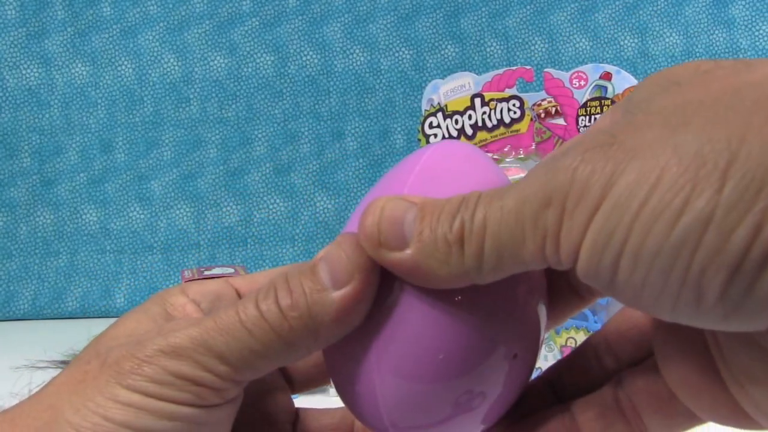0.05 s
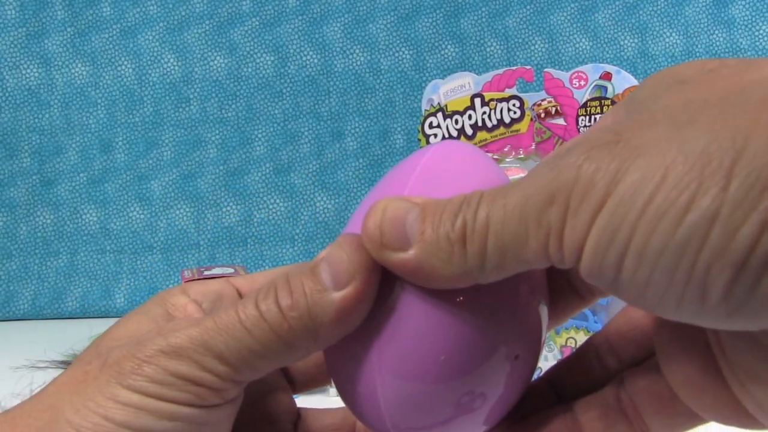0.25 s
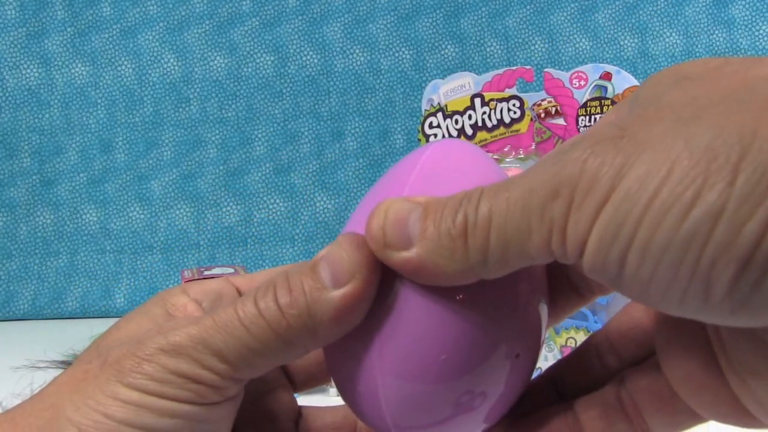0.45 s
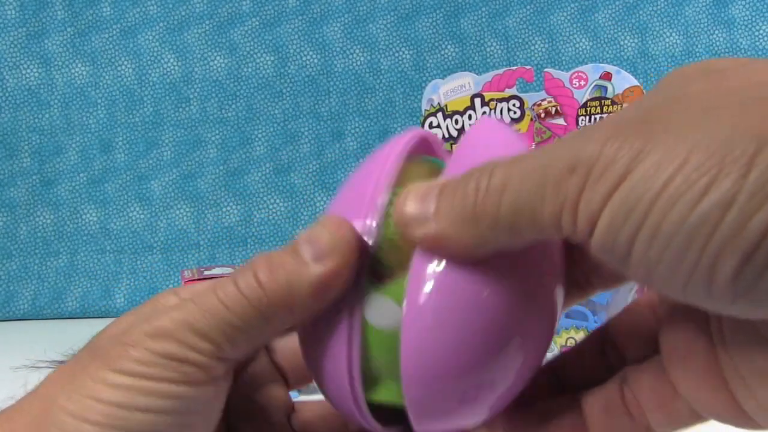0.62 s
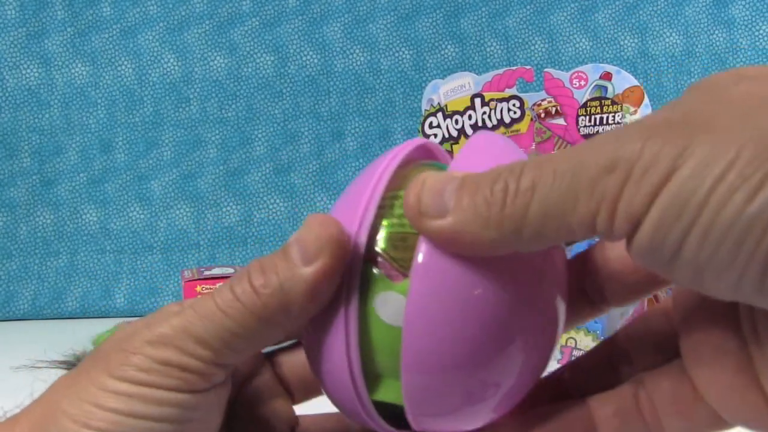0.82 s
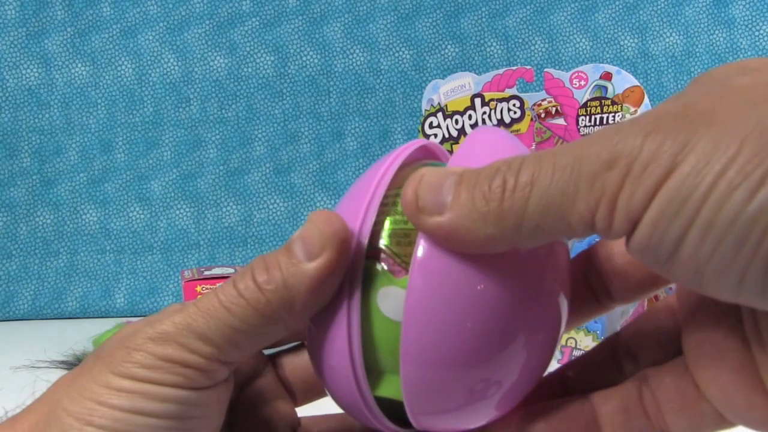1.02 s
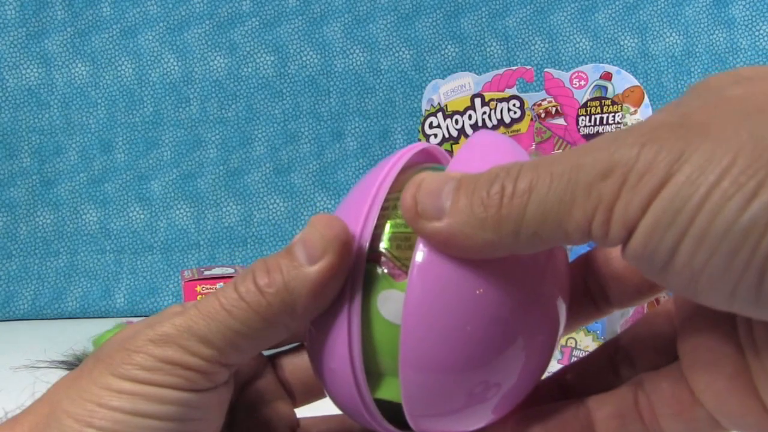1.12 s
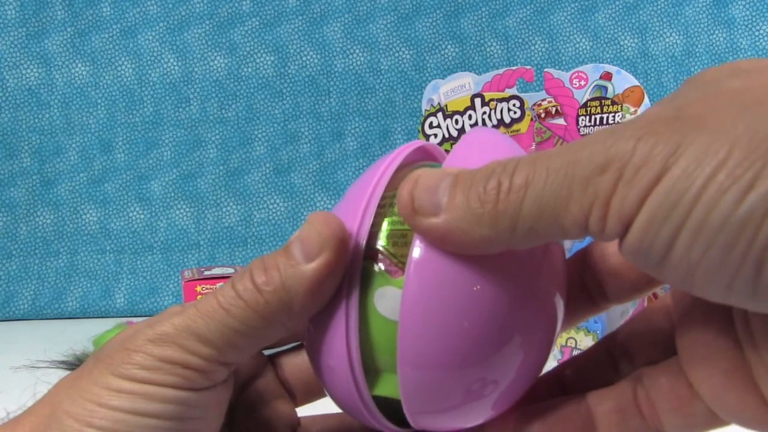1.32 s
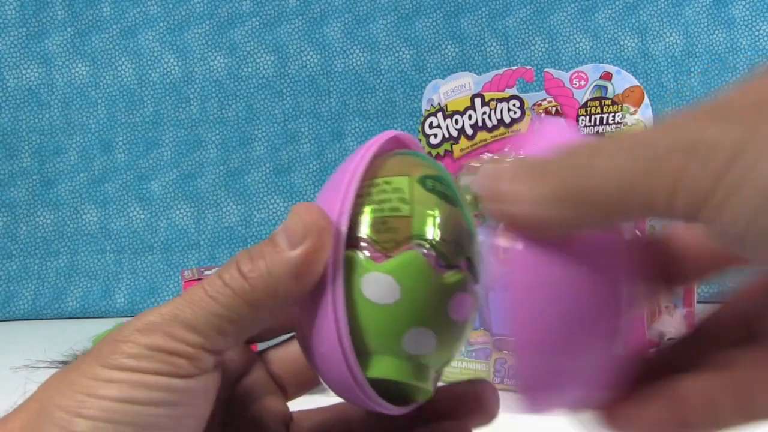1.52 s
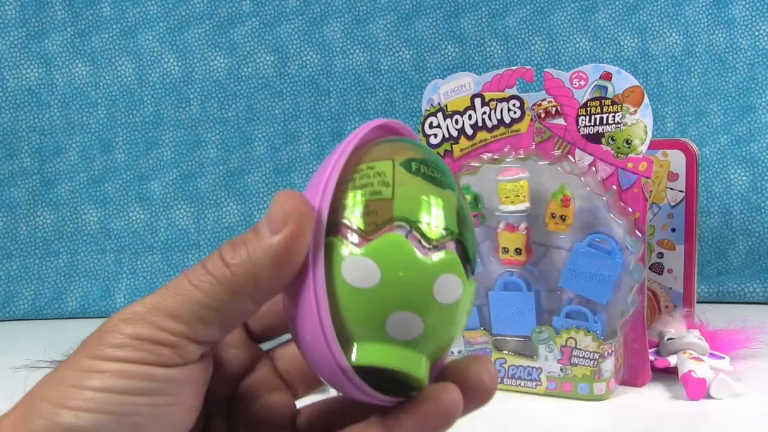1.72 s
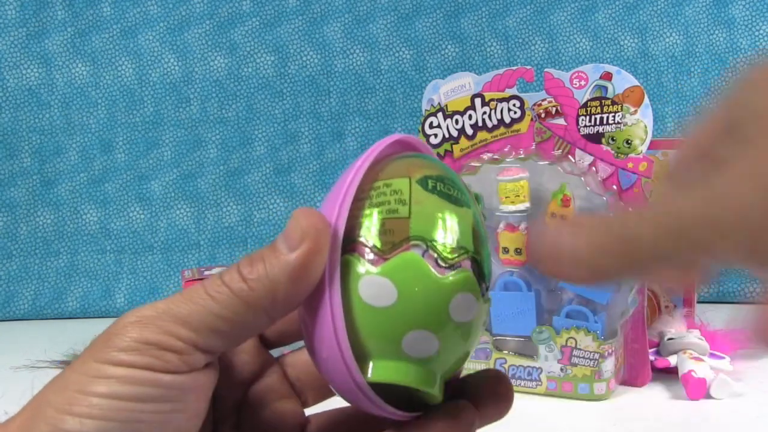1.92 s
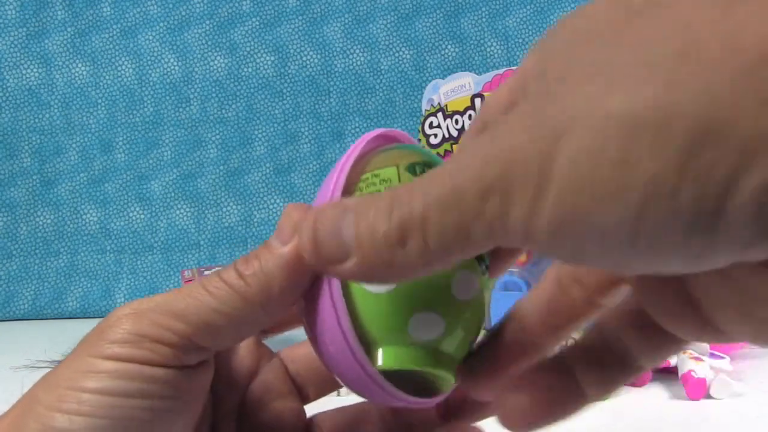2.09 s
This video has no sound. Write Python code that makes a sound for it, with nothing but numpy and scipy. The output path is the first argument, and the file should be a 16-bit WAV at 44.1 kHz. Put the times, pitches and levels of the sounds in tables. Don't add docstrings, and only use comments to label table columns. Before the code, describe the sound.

Plastic egg seam creaking, a loud snapping pop with quick clicks, later a shell half dropped and rocking

```python
import sys
import numpy as np
from scipy import signal
from scipy.fft import rfft, irfft, next_fast_len
from scipy.io import wavfile
from scipy.ndimage import uniform_filter1d

SR = 44100
rng = np.random.default_rng(int(sys.argv[2]) if len(sys.argv) > 2 else 0)


def voltage_ratio(decibels):
    exponent = np.asarray(decibels, float) / 20
    return 10 ** exponent


def file_out(sig):
    cols = np.atleast_2d(sig).T
    lim = np.clip(cols, -1, 1)
    pcm = np.round(lim * 32767).astype(np.int16)
    wavfile.write(sys.argv[1], SR, pcm)


N = 94903

# centre in Hz, width in Hz, level in dB.
OPEN_SHELL = [(210, 19, -5), (437, 160, -20), (650, 140, -3.5), (906, 160, -2), (1500, 110, -2.5),
              (2250, 290, -7.5), (3930, 910, -24.5), (6400, 4500, -28)]
# (centre in Hz, width in Hz, level in dB).
RATTLES = [
    (0.661, -28.5, 0.59, [(210, 130, 5.5), (415, 130, -2.5), (759, 720, -1.5), (1500, 930, 2), (4040, 2800, -4.5), (10870, 5500, -28)]),
    (1.78, -20.5, 0.3, [(210, 180, -4), (342, 130, 3), (570, 200, 1), (1150, 850, -7), (2100, 580, -7.5), (4200, 1500, -21.5)]),
    (1.866, -24, 0.45, [(125.6, 25, -2), (418, 90, -1), (944, 140, 4.5), (1620, 690, -5), (2670, 400, -3.5), (4000, 1070, -15.5), (6660, 3500, -24.5)]),
]
CLICK_TOUCH_S, TABLE_TOUCH_S = .00007, .0003


def unit(x):
    return x / np.sqrt(np.mean(x ** 2) + 1e-20)


def along(points, hz):
    f, v = np.transpose(points)
    return np.interp(np.log(hz + 1), np.log(f + 1), v)


def filtered(x, response):
    m = next_fast_len(N + SR // 2)
    return irfft(rfft(x, m) * response(np.fft.rfftfreq(m, 1 / SR)), m)[..., :N]


def body(x, peaks, sign=-1):
    def response(f):
        total = 0
        for k, (centre, width, db) in enumerate(peaks):
            damping = 1j * f * width
            total = total + sign ** k * voltage_ratio(db) * damping / (centre * centre - f * f + damping)
        return total
    return filtered(x, response)


def coloured(spectrum):
    return unit(filtered(rng.standard_normal(N), lambda hz: voltage_ratio(along(spectrum, hz))))


def spread(pair, alike, spectrum=((100, 0),)):
    def response(hz):
        turn = np.arccos(np.clip(along(alike, hz), -1, 1)) / 2
        return voltage_ratio(along(spectrum, hz)) * [np.cos(turn), np.sin(turn)]
    mid, side = filtered(pair, response)
    return np.array([mid + side, mid - side])


def stereo(spectrum):
    # frequency in Hz, left-right likeness from -1 to 1.
    alike = [(60, 0.084), (240, 0.18), (950, -0.26), (3770, 0.68), (15000, 0.82)]
    return unit(spread(rng.standard_normal((2, N)), alike, spectrum))


def fading(start_s, t60, rise_s=.0002):
    t = np.maximum(np.arange(N) / SR - start_s, 0)
    return voltage_ratio(-60 * t / t60) * (1 - np.exp(-t / rise_s))


def pulses(rows, touch_s):
    s, db = np.transpose(rows)[:2]
    push = np.hanning(round(touch_s * SR) + 2)
    impulses = np.bincount(np.round(s * SR).astype(int), voltage_ratio(db), N)
    return np.convolve(impulses, push / push.sum())[:N]


def hits(rows, peaks, body_db, touch_s):
    # frequency in Hz, density in dB per Hz.
    crack_colour = [(1200, 0.5), (2500, -5), (4000, 3), (6000, 0.5), (8000, -1.5), (11000, -8.5),
                    (14000, -15.5), (16000, -23)]
    crack_t60_s, crack_rise_s = .0075, .0003
    own, size = np.zeros(N + SR), SR // 4
    t = np.arange(size) / SR
    noise = np.pad(coloured(crack_colour), (0, SR))
    crack_shape = voltage_ratio(-60 * t / crack_t60_s) * (1 - np.exp(-t / crack_rise_s))
    for s, db, hz, t60, crack_db in rows:
        at = slice(round(s * SR), round(s * SR) + size)
        note = voltage_ratio(-60 * t / t60) * (1 - np.exp(-t / .0002)) * np.sin(2 * np.pi * hz * t)
        own[at] += voltage_ratio(db) * (note + voltage_ratio(crack_db) * crack_shape * noise[at])
    return own[:N] + voltage_ratio(body_db) * body(pulses(rows, touch_s), peaks)


def rattle(s, db, t60, peaks):
    lump_s, lumps_db = .002, 2

    def smooth(v):
        return uniform_filter1d(v, size=int(lump_s * SR))

    lumps = unit(smooth(smooth(rng.standard_normal(N))))
    contacts = unit(voltage_ratio(lumps_db * lumps) * rng.standard_normal(N))
    return voltage_ratio(db) * body(contacts * fading(s, t60, 0.001), peaks) / np.std(body(contacts, peaks))


def creak():
    # time in seconds, peak in dB.
    slip_rows = [(0.01, -33), (0.03, -35), (0.062, -39), (0.152, -32), (0.218, -32), (0.256, -34),
                 (0.29, -35), (0.334, -35), (0.382, -29), (0.399, -35), (0.447, -35), (0.462, -34),
                 (0.477, -32), (0.487, -32), (0.498, -39), (0.506, -36), (0.513, -36), (0.52, -39),
                 (0.527, -39), (0.533, -39), (0.54, -43), (0.548, -43), (0.556, -40), (0.563, -40),
                 (0.569, -42), (0.584, -45), (0.599, -40), (0.611, -40), (0.622, -39)]
    # time in seconds, peak in dB.
    last_rows = [
        (.636, -39),
        (.650, -40),
    ]
    # centre in Hz, width in Hz, level in dB.
    seam_modes = [(500, 85, 8), (684, 152, 6.5), (1135, 66, 3.5), (1700, 160, -1), (2450, 310, -26)]
    # centre in Hz, width in Hz, level in dB.
    squeezed_modes = [(500, 100, -3.5), (750, 210, 6.5), (1135, 39, 5), (1800, 270, 4), (3300, 910, -3)]
    lag_s, touch_s, squeeze_s, seam_db = .0013, .00038, .37, 25.5
    slips = pulses([(s + lag_s, db) for s, db in slip_rows + last_rows], touch_s)
    late = np.arange(N) / SR > squeeze_s
    loose = body(slips * ~late, seam_modes, sign=0.98)
    return voltage_ratio(seam_db) * (loose + body(slips * late, squeezed_modes, sign=0.92))


def skin_rub():
    # frequency in Hz, density in dB per Hz.
    rub_colour = [(150, -8.5), (400, -7), (1200, -13), (3000, -18.5), (7000, -23), (13000, -38)]
    rub_db, ends_s = -57, 0.6
    return voltage_ratio(rub_db) * stereo(rub_colour) * (np.arange(N) / SR < ends_s)


def hiss():
    # frequency in Hz, density in dB per Hz.
    hiss_colour = [(15, -66), (25, -41.5), (82, -5), (120, -9), (180, -3), (384, -7.5), (641, -9),
                   (3250, -19.5), (16000, -30.5)]
    hiss_db = -55
    return voltage_ratio(hiss_db) * stereo(hiss_colour)


def room(x):
    # frequency in Hz, t60 in seconds.
    tail_t60 = [(150, 0.31), (600, 0.56), (2000, 0.31), (6000, 0.32), (14000, 0.27)]
    # frequency in Hz, left-right likeness from -1 to 1.
    room_alike = [(150, 0.82), (500, .8), (1200, 0.63), (2500, -0.25), (6000, -0.065), (14000, 0.98)]
    tail_db, wall_db, wall_s, wall_t60_s = -12, -15, 0.00928, 0.0067
    turn_s = .04
    out, step, size = np.zeros((2, N + SR)), round(turn_s * SR), SR // 3
    for k in range(0, N, step):
        hz, t, z = signal.stft(rng.standard_normal((2, size)), SR, nperseg=256)
        decay = voltage_ratio(-60 * t / along(tail_t60, hz)[:, None])
        tail = signal.istft(z * decay, SR, nperseg=256)[1][:, :size]
        wall = rng.standard_normal((2, size)) * fading(wall_s, wall_t60_s)[:size]
        answer = voltage_ratio(tail_db) * tail / np.linalg.norm(tail[0])
        answer = answer + voltage_ratio(wall_db) * wall / np.linalg.norm(wall[0])
        wet = signal.fftconvolve(x[None, k:k + step], answer, axes=1)
        out[:, k:k + wet.shape[1]] += wet
    return spread(out[:, :N], room_alike)


def placed(x, pan, lead):
    # frequency in Hz, level in dB.
    scatter_colour = [(300, -27.5), (1000, -14), (2500, -10), (6000, -10.5), (14000, -13.5)]
    scatter_t60_s = .006
    side = np.array([[.5], [-.5]])
    burst = (rng.standard_normal(N) * fading(0, scatter_t60_s))[:512]
    scatter = signal.fftconvolve(x, burst / np.linalg.norm(burst))[:N]
    scatter = filtered(scatter, lambda hz: voltage_ratio(along(scatter_colour, hz)))
    direct = filtered(x, lambda hz: voltage_ratio(side * along(pan, hz)) * np.exp(1j * side * along(lead, hz)))
    return direct + 2 * side * scatter


def pop():
    pop_s, pop_db, swell_s, t60_s = .6680, -2.5, .0032, 0.014
    pop_hz, rise_hz_per_s = 470, 48400
    t = np.arange(N) / SR - pop_s
    shape = np.where(t < 0, np.exp(-(t / swell_s) ** 2), voltage_ratio(-60 * np.abs(t) / t60_s))
    return -voltage_ratio(pop_db) * shape * np.cos(2 * np.pi * (pop_hz * t + rise_hz_per_s * t * t / 2))


def toy_shifts():
    # centre in Hz, width in Hz, level in dB.
    hollow_modes = [(352, 298, -11.5), (625, 200, -5), (780, 75, -1.5)]
    starts_s = [
        .998,
        1.014,
        1.11,
        1.202,
        1.226,
    ]
    # rms level in dB, rise in seconds, t60 in seconds.
    shapes = [
        (-47, .003, .06),
        (-36, 0.0024, 0.1),
        (-41, 0.013, 0.034),
        (-44.5, 0.0018, 0.19),
        (-46.5, 0.0033, 0.1),
    ]
    hollow = unit(body(rng.standard_normal(N), hollow_modes))
    return hollow * sum(voltage_ratio(db) * fading(s, t60, rise) for s, (db, rise, t60) in zip(starts_s, shapes))


def egg():
    # time in seconds,
    # peak in dB, pitch in Hz, t60 in seconds, crack in dB.
    clicks = [(.6640, -24.5, 4140, .006, 3), (.6660, -13.5, 207, 0.079, -1),
              (.6690, -6.5, 2995, 0.013, -1.5), (.6682, -3, 780, 0.014, -16), (.6716, -14, 4600, .008, 0),
              (.6741, -2.5, 960, 0.0085, -7), (.6743, -13, 4400, 0.0089, -4.5),
              (.6932, -33, 3000, 0.0054, -1.5), (.7118, -11, 1550, .010, -14),
              (.7160, -21, 1600, .008, -14), (.7190, -28, 6000, 0.006, 1), (.7210, -17, 1700, .007, -12),
              (.7235, -19.5, 570, 0.018, -3), (.7236, -14.5, 3780, 0.0074, -1),
              (.7322, -32, 4000, .006, 2.5), (.7795, -7, 1790, 0.013, 3), (.7885, -21.5, 4400, 0.0096, 1),
              (.8012, -34, 4000, 0.0065, -2), (.8165, -18.5, 1750, 0.011, 1),
              (.8258, -28.5, 4000, 0.0089, 1), (.8300, -32, 4000, .006, 0), (.8493, -25, 520, .02, -8),
              (.8562, -30, 600, .015, -4), (.8570, -22, 4000, .008, -9), (.8706, -35, 3300, .005, -5),
              (.9103, -53, 950, 0.0088, -4), (.9960, -45, 730, 0.032, 1), (1.459, -48.5, 3020, 0.012, -10),
              (1.615, -47, 600, .01, -2), (1.665, -48, 1200, 0.0094, 4)]
    egg_db = 25.5
    return pop() + hits(clicks, OPEN_SHELL, egg_db, CLICK_TOUCH_S) + toy_shifts() + rattle(*RATTLES[0])


def dropped_half():
    # time in seconds, peak in dB, pitch in Hz, t60 in seconds, crack in dB.
    blow_rows = [
        (1.7768, 3, 1308, 0.011, -18),
        (1.7822, -18.5, 1550, 0.018, -18),
        (1.7860, -14, 1610, 0.013, -10),
        (1.7930, -25, 890, 0.011, -18),
        (1.8195, -19, 450, .02, -26),
        (1.8305, -17.5, 910, .012, -18),
    ]
    # time in seconds, peak in dB, pitch in Hz, t60 in seconds, crack in dB.
    bounce_rows = [
        (1.8617, -4, 760, 0.0062, -18),
        (1.8653, 1.5, 877, 0.016, -13.5),
        (1.8675, -11, 2375, 0.011, -5.5),
        (1.8720, -10, 799, 0.039, -19),
        (1.8745, -13, 2490, 0.017, -6),
        (1.8770, -13, 2360, 0.024, -14),
    ]
    # time in seconds, peak in dB.
    tap_rows = [(1.8890, -25), (1.8940, -15), (1.9052, -19), (1.9150, -20), (1.9256, -27), (1.9340, -21),
                (1.9482, -26), (1.9600, -27), (1.9683, -28), (1.9795, -32), (1.9850, -32), (1.9952, -31),
                (2.0127, -33), (2.0192, -36), (2.0328, -37), (2.0425, -34), (2.0575, -41), (2.0638, -37),
                (2.0698, -40), (2.0770, -45), (2.0900, -47), (2.0950, -42), (2.1100, -40)]
    # centre in Hz, width in Hz, level in dB.
    table_modes = [(210, 170, -26), (357, 114, 0), (470, 75, -10), (570, 84, -11), (730, 80, -1.5),
                   (1236, 168, -7.5), (1550, 140, -8), (2100, 120, -17)]
    # centre in Hz, width in Hz, level in dB.
    rim_modes = [(210, 110, -15.5), (490, 70, -7.5), (680, 110, -4), (857, 100, -7.5), (1085, 120, -5.5),
                 (1430, 520, -7), (2320, 130, -12), (3040, 200, -14)]
    table_db, rim_db, tap_db, tap_touch_s = 29, 27.5, 32, .0002
    taps = voltage_ratio(tap_db) * body(pulses(tap_rows, tap_touch_s), RATTLES[2][3])
    blows = hits(blow_rows, table_modes, table_db, TABLE_TOUCH_S)
    bounces = hits(bounce_rows, rim_modes, rim_db, TABLE_TOUCH_S)
    return taps - blows - bounces + rattle(*RATTLES[1]) + rattle(*RATTLES[2])


def foil():
    # time in seconds, rms level in dB.
    crinkle = [
        (2.0, -56),
        (2.05, -57),
        (2.06, -70),
        (2.1102, -70),
        (2.111, -40),
        (2.118, -43),
        (2.124, -42),
        (2.131, -37),
        (2.14, -39),
        (2.15, -42),
    ]
    # frequency in Hz, density in dB per Hz.
    foil_colour = [(1000, -23), (1700, -6), (2300, -2), (3800, -2), (4800, -10), (7500, -12), (12000, -23),
                   (16000, -32)]
    # time in seconds, peak in dB, pitch in Hz, t60 in seconds, crack in dB.
    snaps = [
        (2.0415, -40, 9800, .006, -2),
        (2.1108, -31, 5500, .006, 1),
        (2.1135, -27, 3300, .009, -12),
        (2.1195, -32, 2800, .01, -14),
        (2.1255, -30, 3300, .012, -7),
        (2.1300, -26, 3700, .016, -14),
        (2.1365, -29, 2400, .014, -14),
    ]
    grain_db, snap_db = 2, 16
    s, db = np.transpose(crinkle)
    grain = voltage_ratio(grain_db * unit(uniform_filter1d(rng.standard_normal(N), size=60)))
    level = voltage_ratio(np.interp(np.arange(N) / SR, s, db, left=-120))
    return unit(grain * coloured(foil_colour)) * level + hits(snaps, OPEN_SHELL, snap_db, CLICK_TOUCH_S)


def scene():
    # frequency in Hz, left over right in dB.
    hand_pan = [(60, -0.2), (240, -0.3), (950, -1.5), (3770, -1), (15000, -1)]
    # frequency in Hz, left lead in radians.
    hand_lead = [(0, 0), (1210, -0.035), (1810, -0.31), (3620, -0.25), (16100, 0.0)]
    # frequency in Hz, left over right in dB.
    table_pan = [(60, -12), (240, -0.5), (950, -1.5), (3770, -1), (15000, -2.5)]
    # frequency in Hz, left lead in radians.
    table_lead = [(0, 0.59), (2330, -0.86), (3620, 0.96), (5860, 0.099), (16100, 0.23)]
    mic_low_hz, seam_wet_db = 135, -0.5
    sources = np.array([creak(), egg() + foil(), dropped_half()])
    seam, hand, table = filtered(sources, lambda f: (1j * f / (mic_low_hz + 1j * f)) ** 2)
    direct = placed(seam + hand, hand_pan, hand_lead) + placed(table, table_pan, table_lead)
    return direct + room(voltage_ratio(seam_wet_db) * seam + hand + table) + skin_rub() + hiss()


def low_pass(x):
    return signal.sosfilt(signal.butter(12, 16000, fs=SR, output="sos"), x)


def record(dry):
    duck_above_db, duck_share, recover_s = -15, 0.12, 0.22
    mic_top_hz, ceiling = 15600, 1.05
    power = np.abs(uniform_filter1d(np.mean(dry ** 2, axis=0), size=441))
    over = np.maximum(10 * np.log10(power + 1e-12) - duck_above_db, 0)
    keep = np.exp(-1 / (recover_s * SR))
    duck_db = duck_share * 20 * signal.lfilter([1 - keep], [1, -keep], over)
    x = filtered(dry * voltage_ratio(-duck_db), lambda f: 1 / np.sqrt(1 + (f / mic_top_hz) ** 40))
    return low_pass(x / (1 + np.abs(x / ceiling) ** 8) ** (1 / 8))


dry = scene()
out = record(dry)
file_out(out)
```